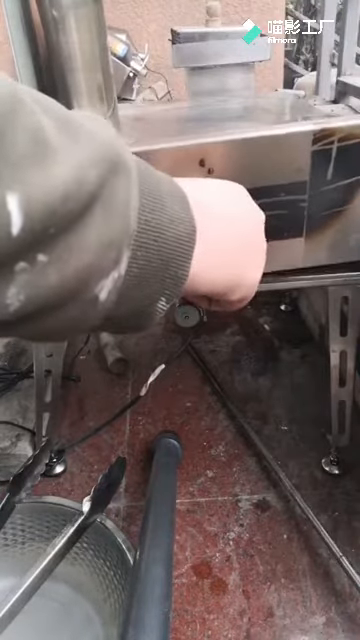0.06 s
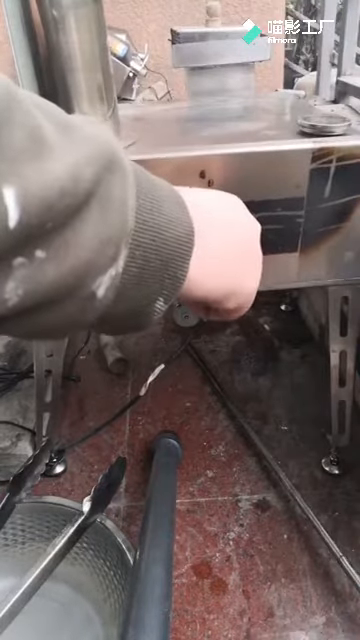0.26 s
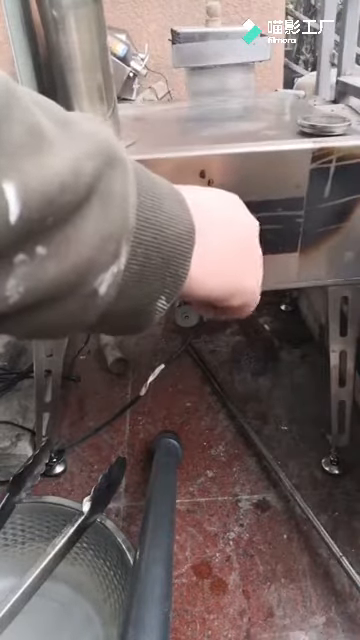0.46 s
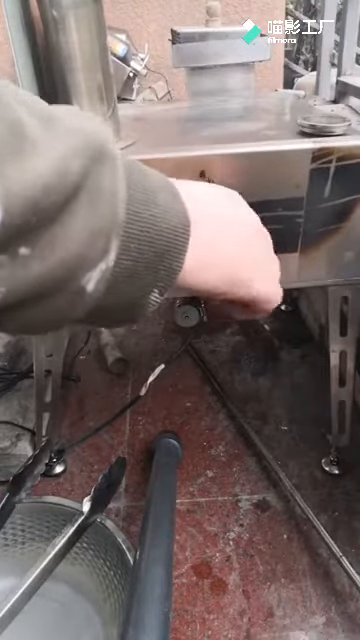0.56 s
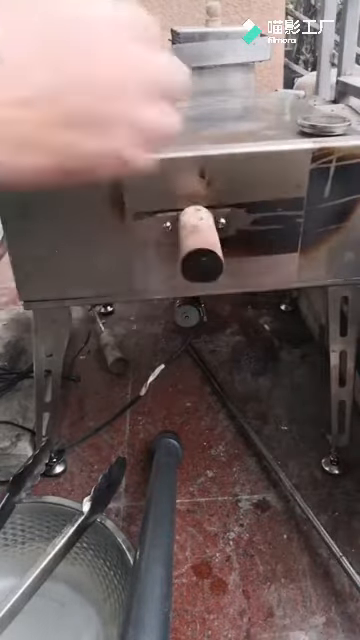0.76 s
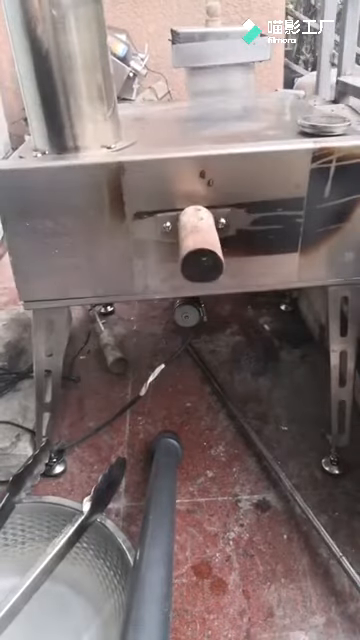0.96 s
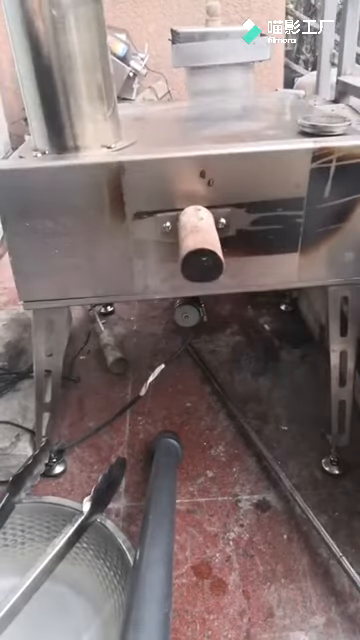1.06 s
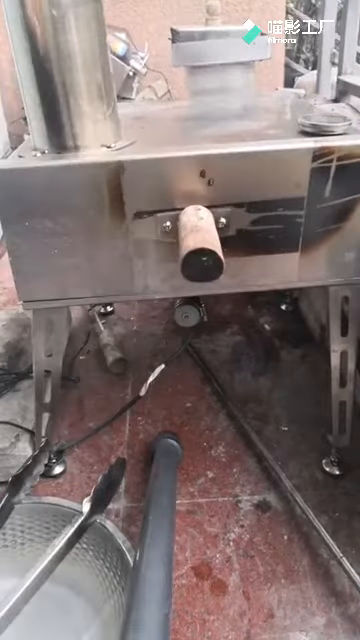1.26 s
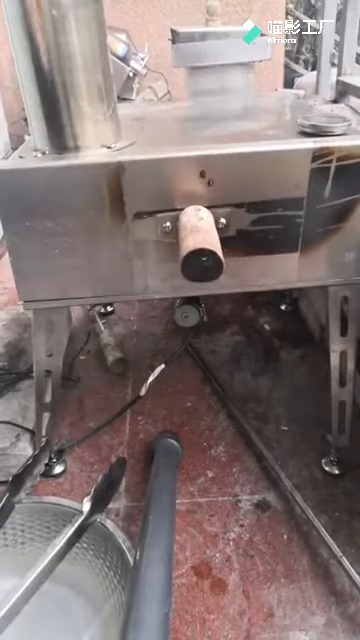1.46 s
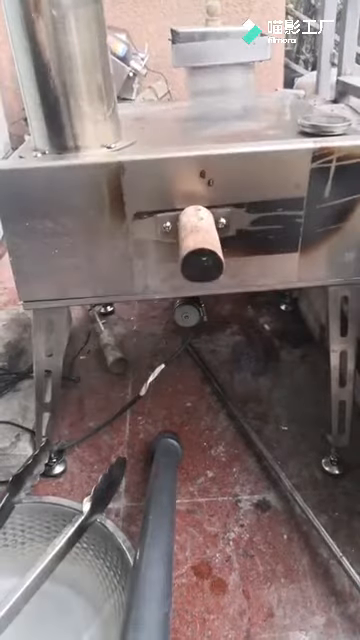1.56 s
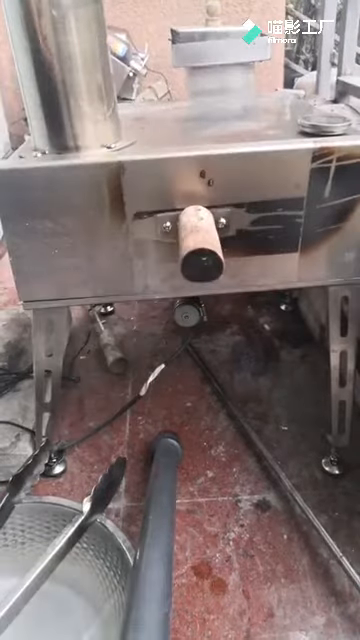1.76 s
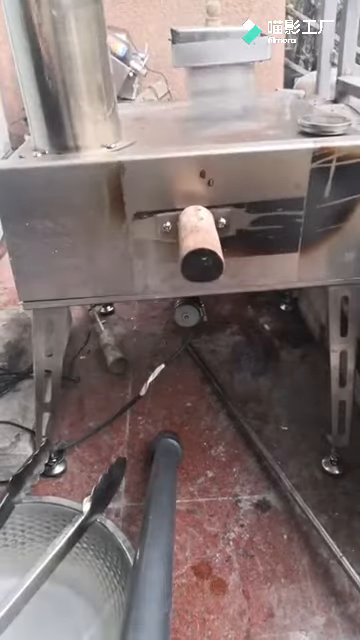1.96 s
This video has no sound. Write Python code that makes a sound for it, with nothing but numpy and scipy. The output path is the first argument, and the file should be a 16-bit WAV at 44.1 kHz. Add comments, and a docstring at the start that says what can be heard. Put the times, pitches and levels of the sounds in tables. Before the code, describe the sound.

A thin steel oven door bumps softly in its guide, then clangs shut in a tight cluster of hits with a brief ring; a faint sleeve rustle follows, over steady blower rumble, close mono microphone, hard workshop.

```python
"""The sheet-steel door of a small oven is pushed shut by hand: it bumps softly in its guide, touches the
frame, then bangs home. Decaying noise makes its clang; fading sines make its rings and thuds.
A sleeve rustles as the hand lets go: a short swell of grainy noise.
A blower rumbles and hisses steadily close by: noise with resonances in it, its hiss made patchy by
earlier sound processing. Thin whines in the treble are sines of unsteady pitch and level."""
import sys
import numpy as np
from scipy import signal
from scipy.fft import rfft, irfft
from scipy.io import wavfile
from scipy.ndimage import map_coordinates

SR = 44100
rng = np.random.default_rng(int(sys.argv[2]) if len(sys.argv) > 2 else 0)


def output_pcm(signal):
    """Save a mono or channel-first signal as 16-bit PCM at the path in sys.argv[1].

    Samples are clipped to [-1, 1] before scaling.
    """
    pcm = np.clip(np.atleast_2d(signal).T, -1, 1) * 32767
    wavfile.write(sys.argv[1], SR, np.round(pcm).astype(np.int16))


def makeup_ratio(level_db):
    """Linear amplitude ratio for a level in decibels (20 dB per factor of ten)."""
    decades = np.asarray(level_db, float) / 20
    return 10 ** decades


N = 88200  # samples: two seconds
TIME = np.arange(N) / SR  # seconds

# Contacts of door and frame. Each row: start in seconds, clang level in dB, ring level in dB,
# thud level in dB, build-up in seconds.
DOOR_CONTACTS = [(0.2185, -16, -31.5, -18.5, 0.0025), (0.2391, -18.5, -23, -27, 0.0012),
                 (0.2432, -21, -24.5, -31, .001), (0.2545, -34.5, -23, -29, 0.0018)]


def at_hz(points, hz):
    """Reads a table between its rows, along a log-frequency axis."""
    return np.interp(np.log(hz), np.log(np.array(points)[:, 0]), np.array(points)[:, 1])


def rms_one(x):
    """Scales a sound to an rms (average strength) of 1."""
    return x / np.sqrt(np.mean(x ** 2) + 1e-20)


def coloured(spectrum):
    """Noise shaped by a spectrum table, silent beyond the table's ends, rms 1."""
    hz = np.maximum(np.arange(N // 2 + 1) * SR / N, 1)
    inside = (hz > spectrum[0][0]) & (hz < spectrum[-1][0])
    white = rfft(rng.standard_normal(N))
    return rms_one(irfft(white * makeup_ratio(at_hz(spectrum, hz)) * inside, N))


def drift(rate_hz):
    """Random wandering with rms 1: noise smoothed so that little faster than rate_hz is left."""
    r = np.exp(-2 * np.pi * rate_hz / SR)
    smooth = signal.lfilter([1], [1, -2 * r, r * r], rng.standard_normal(2 * N))
    return rms_one(smooth[N:])  # the first half only settles the filter


def swell(start, rise, t60):
    """A level curve that builds up from start while a decay of 60 dB per t60 seconds pulls it down."""
    t = np.maximum(TIME - start, 0)
    return (1 - np.exp(-t / max(rise, 1e-4))) * makeup_ratio(-60 * t / t60)


def rings(modes, start, rise):
    """One contact sets every mode ringing, each a sine with its own fading."""
    return [makeup_ratio(db) * swell(start, rise, t60) * np.sin(2 * np.pi * hz * (TIME - start))
            for hz, db, t60 in modes]


def clang():
    """Each contact shakes the sheets into dense noise, which dies at its own speed in each band."""
    # Dense clang of the sheets. Each row: frequency in Hz, relative level in dB per Hz.
    clang_spectrum = [(88, -26), (150, -7.5), (490, -5), (800, -2.5), (900, -9), (1320, -10), (2100, -13.5),
                      (3700, -18), (4840, -14.5), (7500, -6.5), (9800, -6), (11200, -13.5), (11800, -17),
                      (14200, -28), (14600, -42), (15600, -46)]
    # Colour that the light first touch lacks. Each row: frequency in Hz, change in dB.
    touch_colour = [(300, -8), (1000, -14), (3000, -16), (5000, -13), (6500, -6), (7500, -6), (10000, -9),
                    (12000, -13)]
    # Dying of the clang at first. Each row: frequency in Hz, time to fall 60 dB in seconds.
    clang_t60 = [(200, 0.17), (1000, 0.26), (4000, 0.22), (8000, 0.081), (14000, 0.031)]
    # Dying of its tail in box and room. Each row: frequency in Hz, time to fall 60 dB in seconds.
    tail_t60 = [(100, 1.03), (260, 0.61), (700, 0.44), (1840, 0.54), (4850, 0.38), (12800, 0.16)]
    tail_db, tail_rise_s = -6, 0.0074  # level against the clang

    out = np.zeros(N)
    noises = [rfft(coloured(clang_spectrum)) for _ in range(2)]
    hz = np.arange(N // 2 + 1) * SR / N
    band_edges = 100 * 2 ** np.arange(0, 7.5, 1 / 3)  # third-octave steps, in Hz
    for low, high in zip(band_edges, band_edges[1:]):
        mid = np.sqrt(low * high)
        in_band = (hz >= low) * (hz < high)
        near, far = [irfft(noise * in_band, N) for noise in noises]
        for k, (start, clang_db, _, _, rise) in enumerate(DOOR_CONTACTS):
            colour_db = at_hz(touch_colour, mid) if k == 0 else 0
            gain = makeup_ratio(clang_db + colour_db)
            out += gain * near * swell(start, rise, at_hz(clang_t60, mid))
            out += gain * makeup_ratio(tail_db) * far * swell(start, tail_rise_s, at_hz(tail_t60, mid))
    return out


def rings_and_thuds():
    """Contacts ring the clear modes, roughened as loose sheets rattle, and thud in low smooth modes."""
    # Clearest modes of door and box. Each row: frequency in Hz, level in dB against the contact's ring,
    # time to fall 60 dB in seconds.
    box_modes = [(424.5, -0.5, 0.49), (459.5, -6, 0.19), (627.5, -8, 0.38), (745, -9, 0.61), (809, 0, .25),
                 (1104, -11, 0.45), (1352, -12, 0.28), (1500, -14, .22), (1834, -12, .3), (2307, -15, 0.17),
                 (2905, -14.5, 0.22), (3156, -19, .2), (5932, -13.5, 0.15), (6772, -6, 0.086),
                 (7800, -20, 0.058), (9469, -14, .1)]
    # Low air and panel modes that thud. Each row: frequency in Hz, level in dB against the contact's
    # thud, time to fall 60 dB in seconds.
    thud_modes = [(158.3, -3.5, 0.28), (216, -4.5, .3), (266.5, -0.5, 0.34), (311, -8, 0.11),
                  (382, -14.5, 0.34), (518, -8.5, 0.13)]
    rattle_db, rattle_hz = 2.5, 25  # depth and speed

    out = np.zeros(N)
    rattle = makeup_ratio([rattle_db * drift(rattle_hz) for _ in box_modes])  # each mode has its own
    for start, _, ring_db, thud_db, rise in DOOR_CONTACTS:
        out += makeup_ratio(ring_db) * np.sum(rattle * rings(box_modes, start, rise), axis=0)
        out += makeup_ratio(thud_db) * sum(rings(thud_modes, start, rise))
    return out


def crack():
    """A bright, quickly dying burst of noise shortly after the second contact."""
    # Each row: frequency in Hz, relative level in dB per Hz.
    crack_spectrum = [(1000, -17), (6000, -15), (8000, 6.5), (9500, -3), (11000, -8), (14500, -34),
                      (15600, -38)]
    start_s, level_db, rise_s, t60_s = 0.2405, -12, 0.00091, 0.041
    return makeup_ratio(level_db) * swell(start_s, rise_s, t60_s) * coloured(crack_spectrum)


def bumps():
    """The sliding door bumps softly in its guide: each bump is one low sine that dies away."""
    # Each row: start in seconds, level in dB.
    guide_bumps = [(0.002, -24), (0.117, -21)]
    pitch_hz, t60_s, rise_s = 157.7, 0.17, 0.0088
    return sum(rings([(pitch_hz, db, t60_s)], start, rise_s)[0] for start, db in guide_bumps)


def door():
    """All knocks of the door together, with the deep bass filtered away."""
    knocks = clang() + rings_and_thuds() + crack() + bumps()
    low_cut_hz = 109
    return signal.sosfilt(signal.butter(2, low_cut_hz, "high", fs=SR, output="sos"), knocks)


def slide():
    """The door slides in its guide: a dull lumpy rub of noise that stops at the first contact."""
    # Each row: frequency in Hz, relative level in dB per Hz.
    slide_spectrum = [(130, -4), (250, 6), (380, -9), (670, -6), (800, -7.5), (1000, -25)]
    level_db, lumps_db = -47.5, 2.5
    sliding = TIME < DOOR_CONTACTS[0][0]
    return makeup_ratio(level_db + lumps_db * drift(15.0)) * sliding * coloured(slide_spectrum)


def sleeve():
    """Cloth brushes cloth: a short swell of grainy hiss."""
    # Each row: frequency in Hz, relative level in dB per Hz.
    rustle_spectrum = [(900, 1), (2000, -2.5), (4000, -5.5), (7000, 0.5), (9000, -2), (12000, -12)]
    start_s, rise_s, fall_s, level_db = 0.75, 0.11, 0.1, -54
    t = TIME - start_s - rise_s  # zero at the peak
    shape = np.exp(-(t / np.where(t < 0, rise_s, fall_s)) ** 2)
    return makeup_ratio(level_db + 0.92 * drift(80.0)) * shape * coloured(rustle_spectrum)


def patchy(x):
    """Patches left by earlier sound processing: narrow bands swell and sink each on their own; rms 1."""
    depth_db, width_hz, length_s = 4.5, 70.43, 0.1399
    hz, seconds, spectrum = signal.stft(x, SR, nperseg=1024)
    places = np.meshgrid(hz / width_hz, seconds / length_s, indexing="ij")
    # random levels on a coarse grid, blended between its points
    patches = map_coordinates(rng.standard_normal((400, 100)), places, order=1, mode="wrap")
    return rms_one(signal.istft(spectrum * makeup_ratio(depth_db * patches), SR, nperseg=1024)[1][:N])


def blower():
    """A rush of air with the narrow patches of sound processing, plus noise through narrow resonances."""
    # The rush of air. Each row: frequency in Hz, relative level in dB per Hz.
    rush_spectrum = [(15, -71), (25, -18), (37, -20), (54, -9.5), (111, 0.5), (162, -2.5), (180, -5),
                     (369, -13.5), (422, -25.5), (536, -12.5), (580, -15), (738, -14.5), (889, -27.5),
                     (2500, -33), (3300, -38), (4700, -36.5), (5200, -29), (6300, -33), (8000, -27),
                     (8700, -36), (9000, -28), (9300, -28), (9900, -16.5), (10120, -31), (10800, -32),
                     (12500, -36.5), (13000, -36.5), (14100, -40.5), (14450, -75), (15200, -75)]
    # Resonances. Each row: frequency in Hz, width in Hz of each of two equal filters, rms level in dB.
    resonances = [(123.5, 52, -52), (532, 21, -61), (695, 225, -61), (5740, 26, -74), (7870, 70, -76.5)]
    rush_db = -43
    out = makeup_ratio(rush_db + 0.65 * drift(2.6)) * patchy(coloured(rush_spectrum))
    for hz, width, db in resonances:
        r = np.exp(-np.pi * width / SR)
        poles = [1, -2 * r * np.cos(2 * np.pi * hz / SR), r * r]
        once = signal.lfilter([1, 0, -1], poles, rng.standard_normal(N))
        twice = signal.lfilter([1], poles, once)
        out += makeup_ratio(db + 1.16 * drift(6.7)) * rms_one(twice)
    return out


def tone(hz, db):
    """A sine that follows a pitch and an rms level."""
    return np.sqrt(2) * makeup_ratio(db) * np.sin(2 * np.pi * np.cumsum(hz) / SR)


def motor_song():
    """The motor sings in several sines whose pitch and strength swing once a turn."""
    # Each row: frequency in Hz, pitch swing in Hz, rms level in dB.
    motor_lines = [(8960, 66, -61.5), (9780, 79, -60), (9925, 95, -55.5)]
    turns_hz, turn_wander_hz, turn_depth = 48.9, 0.84, 0.13  # the depth is a share of the strength
    jitter_hz, flutter_db = 18, 2.5
    turn = np.sin(2 * np.pi * np.cumsum(turns_hz + turn_wander_hz * drift(2.0)) / SR)
    out = np.zeros(N)
    for hz, swing, db in motor_lines:
        pitch = hz + swing * turn + jitter_hz * drift(144.5)
        out += (1 + turn_depth * turn) * tone(pitch, db + flutter_db * drift(93.0))
    return out


def whine():
    """A wandering sine with a fainter line on each side."""
    # Path of the whine. Each row: time in seconds, frequency in Hz, rms level in dB.
    whine_path = [(0, 5200, -68), (.2, 5135, -66.5), (.45, 5160, -62), (.58, 5130, -65), (.64, 5180, -66.5),
                  (.74, 5080, -61), (.8, 5050, -76), (.86, 5180, -63), (.9, 5170, -58), (1.04, 5180, -60.5),
                  (1.1, 5120, -63.5), (1.18, 5180, -53), (1.35, 5200, -63.5), (1.45, 5220, -70),
                  (1.58, 5270, -71), (1.64, 5380, -56), (1.7, 5320, -67), (1.76, 5430, -64),
                  (1.829, 5416, -60), (2, 5445, -61)]
    jitter_hz = 13.3
    side_hz, side_db, side_swing_db = 320, -13, 2.5  # distance, and level against the middle line
    seconds, hz, db = np.transpose(whine_path)
    pitch = np.interp(TIME, seconds, hz) + jitter_hz * drift(49.0)
    level_db = np.interp(TIME, seconds, db)
    out = tone(pitch, level_db + 2.8 * drift(36.0))
    for side in (-1, 1):
        out += tone(pitch + side * side_hz, level_db + side_db + side_swing_db * drift(2.2))
    return out


def scene():
    """Door, sleeve, blower and whines added up in one channel."""
    mix = door() + slide() + sleeve() + blower() + motor_song() + whine()
    return mix[None]


def top_cut(x):
    """Nothing passes above the cut-off."""
    return signal.sosfilt(signal.butter(12, 15670, fs=SR, output="sos"), x)


def record(dry):
    """Turns the finished mix into the sound that is written."""
    return top_cut(dry)


dry = scene()
out = record(dry)
output_pcm(out)
```